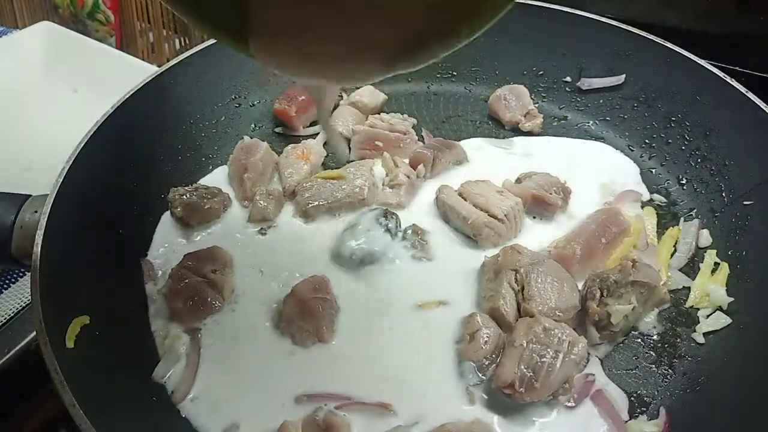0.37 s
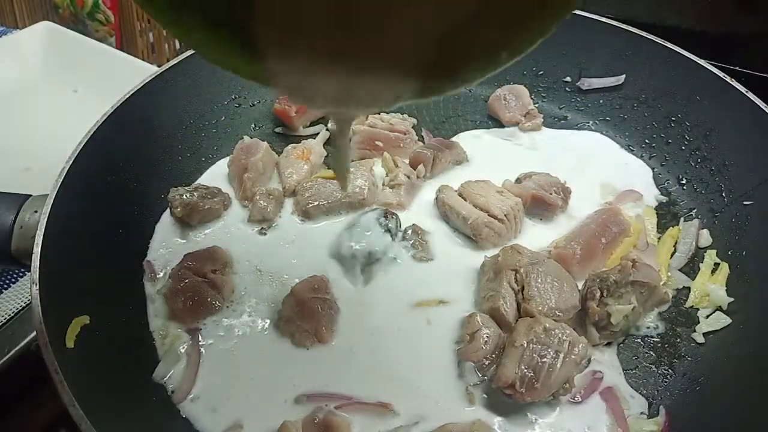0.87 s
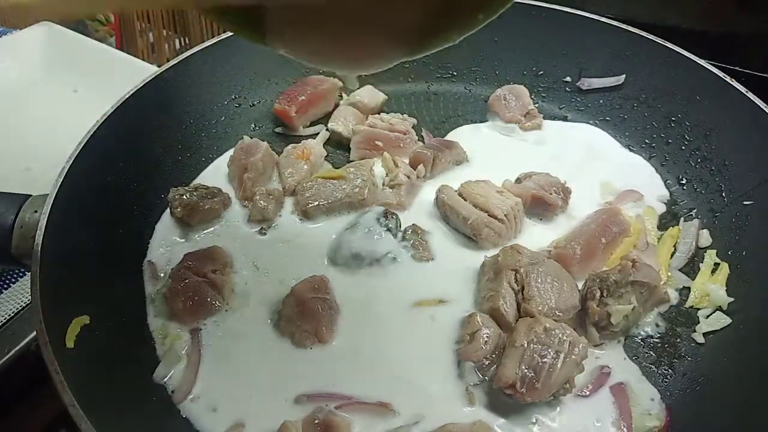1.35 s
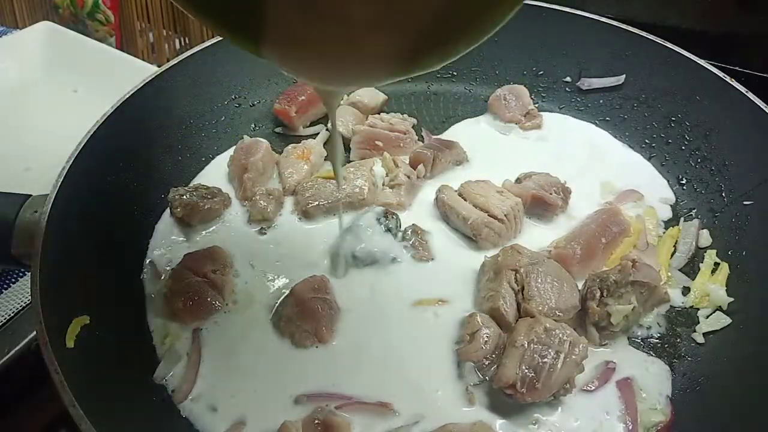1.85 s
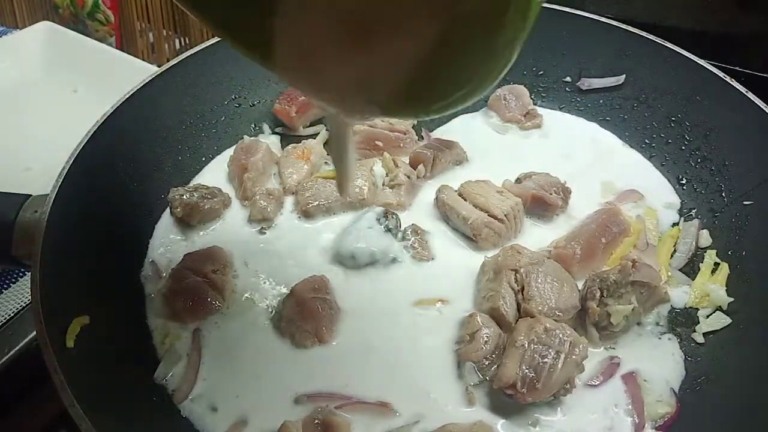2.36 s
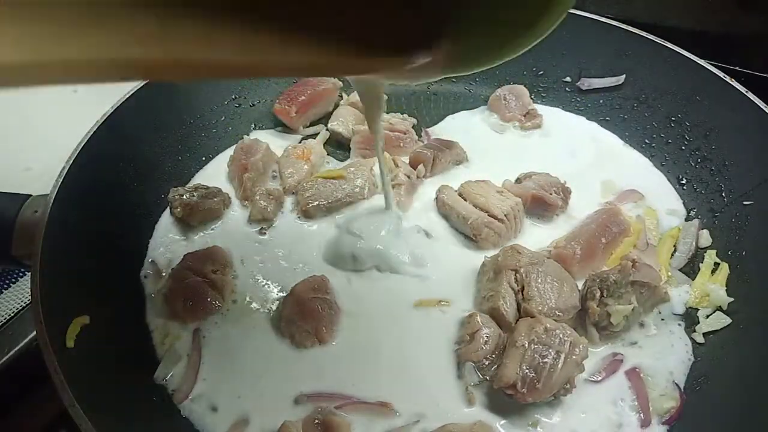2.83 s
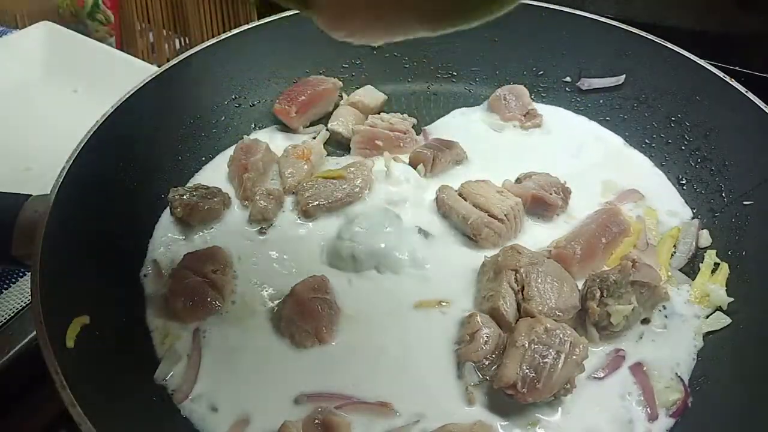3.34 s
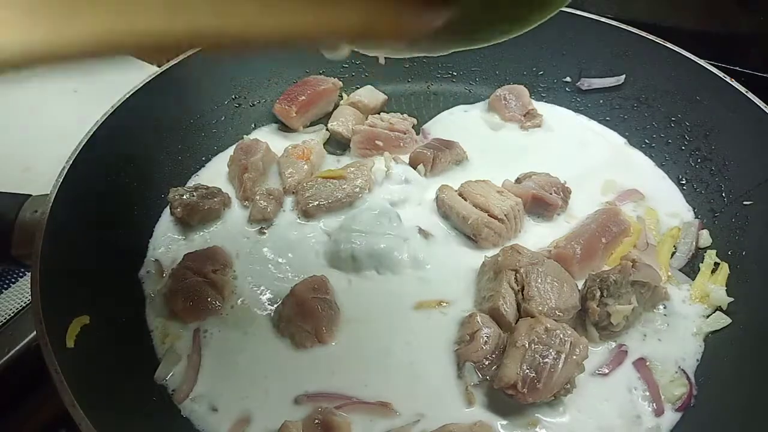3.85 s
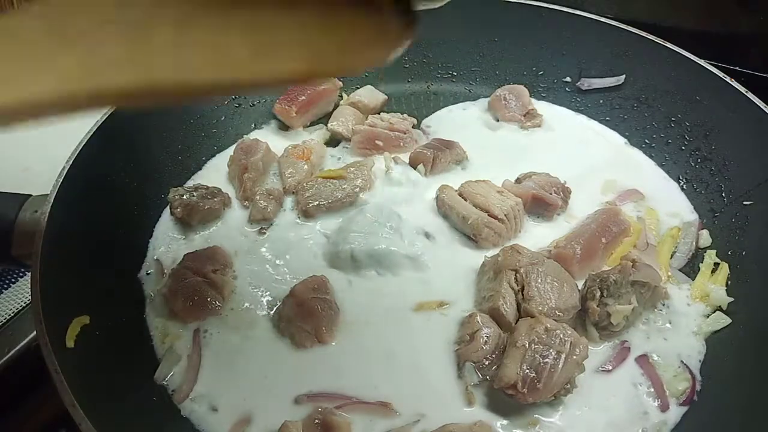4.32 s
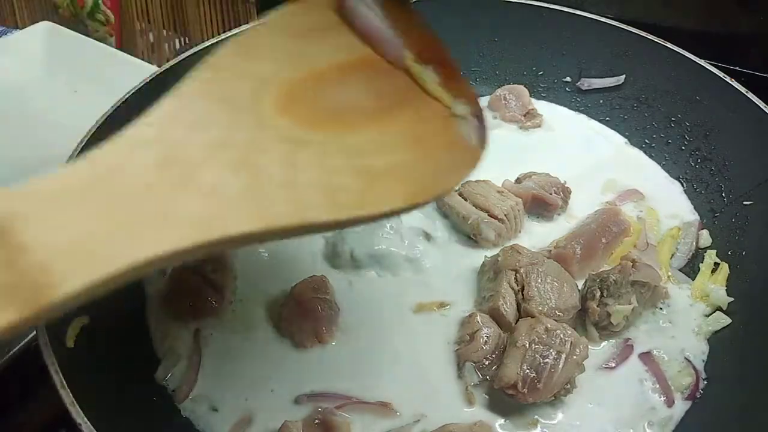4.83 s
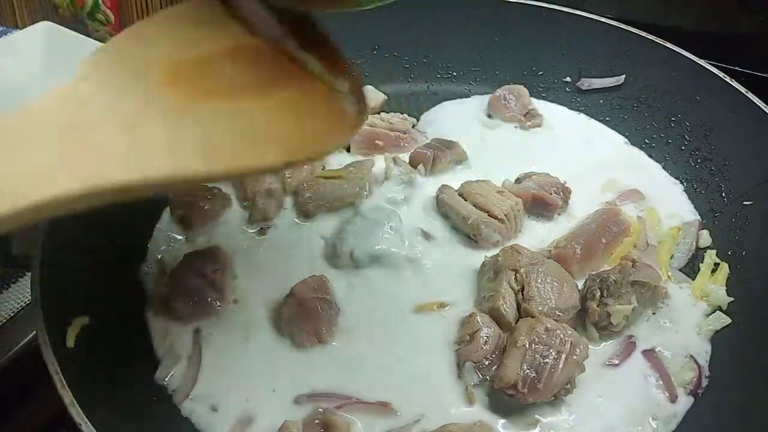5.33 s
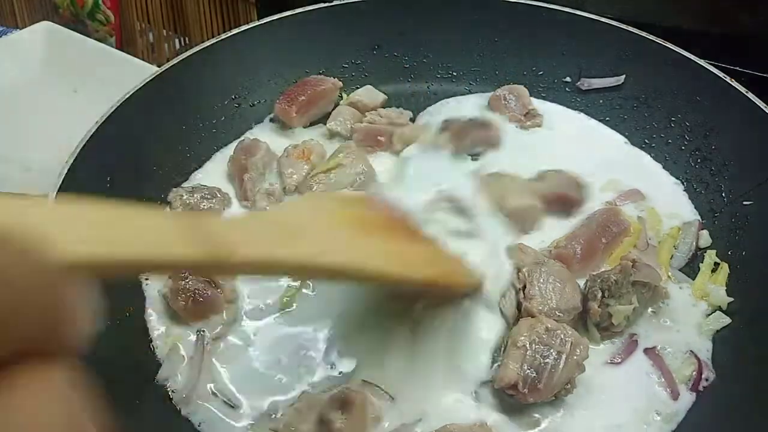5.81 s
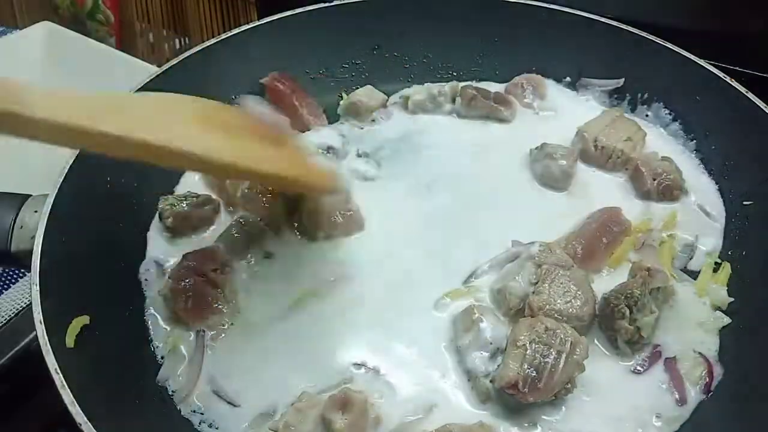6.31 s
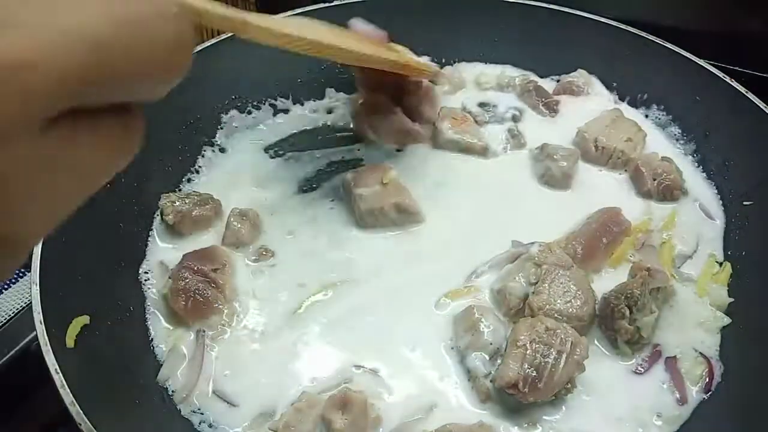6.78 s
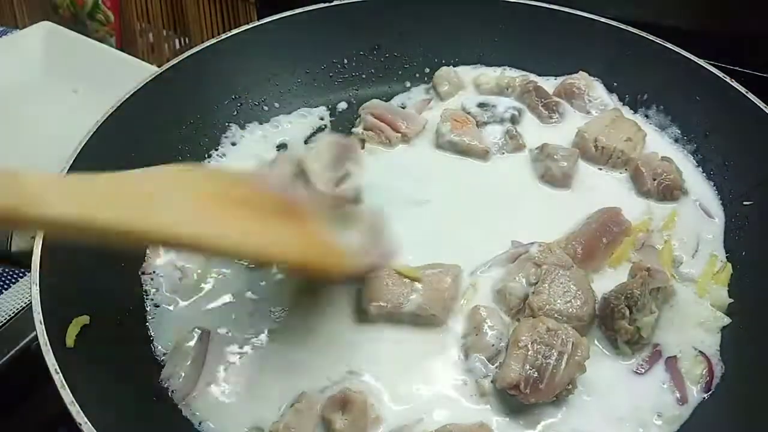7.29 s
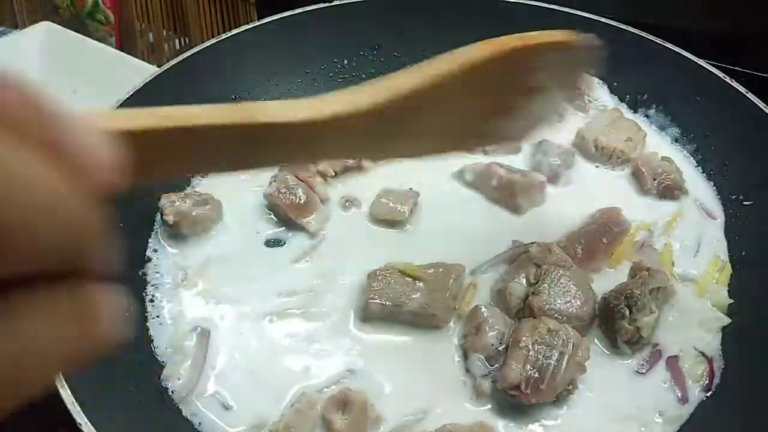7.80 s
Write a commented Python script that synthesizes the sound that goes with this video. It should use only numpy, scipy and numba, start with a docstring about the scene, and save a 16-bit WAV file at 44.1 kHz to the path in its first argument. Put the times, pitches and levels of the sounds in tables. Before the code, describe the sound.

In a small kitchen, a steady, bright sizzle of creamy liquid fills a close microphone, peppered with crackles and snappy steam pops. A wooden spatula taps a bowl irregularly with short hollow knocks. Later it stirs the pan with duller knocks; the sizzle flares sharply, then sinks to a weaker, patchy hiss. A faint wavering mains hum and low rumble lie underneath.

```python
"""In a small kitchen, creamy liquid sizzles in a hot pan close under one microphone.
Thousands of steam bubbles burst: filtered noise, clicks and short damped sines; some pop loudly.
A wooden spatula knocks the last drops out of a bowl, then stirs: both are ringing modes.
Stirring bares hot metal and later calms the sizzle. A mains hum of two sines wavers over a low
rumble of filtered noise, with a few dull bumps."""
import sys
import numpy as np
from scipy import signal
from scipy.fft import rfft, irfft
from scipy.io import wavfile
from scipy.ndimage import uniform_filter1d
from numba import njit

SR = 44100
rng = np.random.default_rng(int(sys.argv[2]) if len(sys.argv) > 2 else 0)


def dump_mix(stems):
    """Bounce the given channels to the path in sys.argv[1] as a 16-bit WAV at rate SR."""
    frames = np.atleast_2d(stems).T  # one column per channel
    limited = np.clip(frames, -1, 1)  # hard clip at full scale
    pcm = np.round(limited * 32767).astype(np.int16)
    wavfile.write(sys.argv[1], SR, pcm)


def volts_from_db(level):
    """Convert decibel levels to linear amplitude ratios."""
    exponent = np.asarray(level, float) / 20
    return 10 ** exponent


N = 359856
TIME = np.arange(N) / SR
MAIN_HZ = (4000, 9000)  # band in which the level of the main sizzle is counted


def curves(table):
    """Draw each column of a table as a line through time, one value a sample."""
    s, *columns = np.transpose(table)
    return [np.interp(TIME, s, c) for c in columns]


def filtered(x, order, hz, kind):
    """Pass x through a smooth filter that keeps only part of the pitch range."""
    return signal.sosfilt(signal.butter(order, hz, kind, fs=SR, output="sos"), x)


def below(x, hz):
    """Keep what lies below hz, without shifting it in time."""
    return signal.sosfiltfilt(signal.butter(2, hz, fs=SR, output="sos"), x)


def band_level(x, lo_hz, hi_hz):
    """Scale the whole sound so that one band of it has rms 1."""
    part = filtered(x, 4, [lo_hz, hi_hz], "bandpass")
    return x / np.sqrt(np.mean(part ** 2))


def colour(x, points, peaks=()):
    """Flatten the long-term spectrum, then give it the wanted one with its resonances."""
    spec = rfft(x)
    hz = np.arange(N // 2 + 1) * SR / N + 1
    spec = spec / np.sqrt(uniform_filter1d(np.abs(spec) ** 2, size=3000))
    point_hz, point_db = np.transpose(points)
    db = np.interp(np.log(hz), np.log(point_hz), point_db)
    for peak_hz, width_hz, peak_db in peaks:
        db = db + peak_db / (1 + (2 * (hz - peak_hz) / width_hz) ** 2)
    return irfft(spec * volts_from_db(db), N)


def walk(rate):
    """Wander at random: levels held 1 / rate s, then smoothed twice; spread near 1."""
    hold = int(SR / rate)
    steps = np.repeat(rng.standard_normal(N // hold + 1), hold)
    return 0.47 * uniform_filter1d(uniform_filter1d(steps, hold), hold)[:N]


@njit
def ring(count, at_s, hz, t60, size, rise_s):
    """Damped sines that swell in over rise_s and fall by 60 dB in t60 seconds."""
    out = np.zeros(count)
    for k in range(len(at_s)):
        first = int(at_s[k] * SR)
        turn = np.exp((2j * np.pi * hz[k] - np.log(1000) / t60[k]) / SR)
        z, late, fill = size[k] + 0j, 1., np.exp(-1 / (rise_s[k] * SR))
        for i in range(first, min(count, first + int(t60[k] * SR))):
            out[i] += z.imag * (1 - late)
            z, late = z * turn, late * fill
    return out


def spurts(at_s, size, fade_s):
    """Envelope of sudden bursts that die away, with slightly softened edges."""
    out = np.zeros(N)
    for s, g, fade in zip(at_s, size, fade_s):
        part = out[int(s * SR):int((s + 6 * fade) * SR)]
        part += g * np.exp(-np.arange(len(part)) / (fade * SR))
    return uniform_filter1d(out, size=12)


def swells(start_s, length_s, db):
    """Sum of soft-edged rises in level."""
    total = 0
    for s, length, d in zip(start_s, length_s, db):
        from_middle = np.abs((TIME - s - length / 2) / (0.48 * length))
        total = total + volts_from_db(d) * np.exp(-from_middle ** 5.9)
    return total


# the hum swells: start t/s, length t/s, level/dB (before the waver)
HUM_SWELLS = [(0.009, 0.13, -55), (0.177, 0.077, -54), (0.326, 0.081, -60), (0.447, 0.32, -53.5),
              (0.83, 0.13, -52), (1.022, 0.038, -52), (1.14, 0.089, -51), (1.423, 0.047, -59),
              (1.575, 0.076, -61), (1.735, 0.45, -54.5), (2.293, 0.075, -51), (2.505, 0.34, -52.5),
              (3.242, 0.036, -61), (3.4, 0.049, -60), (3.558, 0.12, -54), (3.777, 0.075, -49),
              (3.902, 0.077, -51), (4.036, 0.051, -55), (4.175, 0.064, -58), (4.314, 0.066, -55),
              (4.48, 0.041, -57), (4.567, 0.22, -59), (4.78, 0.25, -51.5), (5.119, 0.054, -61),
              (5.281, 0.086, -58), (5.415, 0.037, -59), (5.66, 0.066, -59), (5.853, 0.16, -54),
              (6.112, 0.58, -53.5), (6.803, 0.22, -52.5), (7.143, 0.15, -53.5), (7.398, 0.058, -59),
              (7.894, 0.19, -50.5)]


def hum_level():
    """Strength of the lower mains line: wavering swells over a faint, restless floor."""
    swelling = volts_from_db(3 * walk(22)) * swells(*np.transpose(HUM_SWELLS))
    return swelling + volts_from_db(-66.5 + 9.1 * walk(12))


# the upper line of the hum swells less often: start t/s, length t/s, level/dB
OVERTONE_SWELLS = [(0.188, 0.042, -61), (0.397, 0.09, -56), (1.181, 0.043, -62), (1.427, 0.06, -53.5),
                   (2.52, 0.16, -55), (3.003, 0.07, -51.5), (4.874, 0.117, -51.5), (6.475, 0.039, -64),
                   (6.852, 0.034, -60), (7.076, 0.043, -58)]


def mains_hum(first):
    """Mains hum is a steady low tone and one an octave up; only their strengths change."""
    second = swells(*np.transpose(OVERTONE_SWELLS)) + volts_from_db(-76.5 + 10.6 * walk(14))
    phase = 2 * np.pi * 120 * TIME  # 120 Hz
    return np.sqrt(2) * (first * np.sin(phase) + second * np.sin(2 * phase))


# colour of the rumble: f/Hz, level/dB (relative, per Hz)
RUMBLE_COLOUR = [(15, -55), (25, -71), (64, -14), (93, -5), (118, 2.5), (172, 1), (257, -9), (314, -12),
                 (500, -34), (650, -45), (1100, -120)]
# stove and worktop shake: start t/s, length t/s, level/dB (upper rumble), level/dB (deepest rumble)
SHAKES = [(0.195, 0.073, -58, -72), (1.44, 0.052, -56, -70), (1.975, 0.18, -81, -62),
          (2.53, 0.32, -57, -69), (4.783, 0.31, -69, -80), (6.412, 0.13, -56, -68),
          (7.957, 0.079, -70, -69)]


def rumble(hum_strength):
    """Low noise in two bands that waver alone, rise with the hum and swell with the shakes."""
    # a very faint flat floor above 900 Hz
    noise = colour(rng.standard_normal(N), [*RUMBLE_COLOUR, (900, -60)])
    deepest = below(noise, 100)
    start_s, length_s, upper_db, deepest_db = np.transpose(SHAKES)
    follow = (uniform_filter1d(hum_strength, size=4000) / np.mean(hum_strength)) ** 0.51
    upper_level = follow * volts_from_db(-65.5 + 2.7 * walk(11.0)) + swells(start_s, length_s, upper_db)
    deepest_level = follow * volts_from_db(-68 + 4.5 * walk(7.6)) + swells(start_s, length_s, deepest_db)
    return (upper_level * band_level(noise - deepest, 111, 280)
            + deepest_level * band_level(deepest, 40, 108))


# dull bumps from stove and worktop: t/s, level/dB (before the soft start), f/Hz, t60 t/s
BUMPS = [(1.19, -51, 326, .15), (2.24, -49, 412, .15), (2.521, -41.5, 160, 1), (2.62, -50.5, 315, 0.91),
         (2.83, -45, 280, 0.14), (6.409, -41.5, 332, 0.17), (6.44, -37, 164, 0.28), (6.451, -44, 213, .2),
         (6.47, -46, 420, .12), (6.481, -41, 270, 0.12), (6.819, -42.5, 390, 0.11), (7.2, -51, 195, .2)]


def bumps():
    """Each bump is one low damped sine with a soft start."""
    s, db, hz, t60 = np.transpose(BUMPS)
    return ring(N, s, hz, t60, volts_from_db(db), 3 / hz)


def room_tail():
    """The small kitchen answers with short diffuse noise that dies away."""
    t = np.arange(SR // 5) / SR
    t60_s, first_echo_s = .12, .006
    return rng.standard_normal(len(t)) * np.exp(-np.log(1000) * t / t60_s) * (t > first_echo_s)


def knocks(blows, modes, thud_db, thud_fall_db, base_db, contact_s, lag, crunch_db):
    """Blows share modes: strongest near the spot, high ones if hard, low ones if heavy."""
    s, db, spot_hz, edge_db, hardest_db = np.transpose(blows)[..., None]  # a row a blow
    hz, mode_db, t60 = np.transpose(modes)  # a column a mode
    # a blow that rings low is a heavy one: thud_db at 1 kHz, less for each octave up
    low_db = thud_db - thud_fall_db * np.log2(spot_hz / 1000)
    near = np.exp(-(np.log(hz / spot_hz) / 0.085) ** 2)
    t60 = t60 * (1 + .5 * near)  # the mode under the blow also rings longer
    group = np.digitize(hz, [700, 1600, 2300])  # low, middle, edge, hardest edge
    group_db = np.choose(group, [low_db, 0 * db, edge_db, hardest_db])
    gain_db = db + base_db + mode_db + 10 * near + group_db
    sign = (-1.) ** np.arange(len(hz))
    rise_s = np.tile(contact_s * (1000 / hz) ** lag, len(s))  # low modes build up later
    at_s = (s + 0 * hz).ravel()
    dry = np.zeros(N)
    # every mode is a close pair, tuned a little differently by each wet contact
    for pair_db in (-.5, -9):
        tuned_hz = hz * (1 + 0.016 * rng.standard_normal((len(s), len(hz))))
        size = sign * volts_from_db(gain_db + pair_db)
        dry += ring(N, at_s, tuned_hz.ravel(), t60.ravel(), size.ravel(), rise_s)
    # wood crushing wet food adds a short dull crunch
    crunch = filtered(rng.standard_normal(N), 2, [450, 2400], "bandpass")
    dry += crunch * spurts(s.ravel(), volts_from_db(db.ravel() + crunch_db), np.full(len(s), .004))
    return dry + volts_from_db(-41) * signal.fftconvolve(dry, room_tail())[:N]


# wooden spatula on the bowl: t/s, level/dB (relative), strongest ring f/Hz,
# edge level/dB, hardest edge level/dB (both added to the higher modes)
BOWL_KNOCKS = [(0.168, -22.5, 1120, -16, -19), (0.188, -16.5, 616, -8, -6), (0.406, -29.5, 818, -15, -16),
               (0.66, -22, 1130, -5, -14), (0.742, -35.5, 1400, 5, -5), (0.315, -30, 1100, -8, -15),
               (0.706, -21, 824, -14, -23), (1.013, -11, 888, -29, -31), (1.133, -20, 1020, -28, -24),
               (1.338, -12, 920, -32, -32), (1.631, -9, 945, -33, -31), (1.767, -25.5, 960, -19, -19),
               (2.033, -20.5, 905, -1, -3), (2.212, -28, 686, -16, 0), (2.512, -24, 874, -18, -19),
               (2.579, -15, 627, -10, -23), (2.763, -23.5, 623, -6, 1.5), (2.833, -23.5, 810, -17, -16),
               (3.127, -19.5, 856, -21, -12.5), (3.2, -28, 660, -2, -13), (3.5, -11, 985, -6.5, 0),
               (3.507, -21, 1140, -8, -2), (3.805, -13.5, 1130, -7, -12), (3.813, -22, 1200, -12, -15),
               (4.153, -11, 930, -29, -7), (4.158, -16, 1080, -25, -2.5), (4.443, -26, 1140, -17, -18),
               (4.697, -34, 720, -15, -15), (4.932, -27, 1000, -13, 1)]
# modes of the bowl: f/Hz, level/dB (relative), t60 t/s (away from the blow)
BOWL_MODES = [(390, 19.5, 0.023), (539, 16, 0.073), (660, 13.5, 0.031), (824, 5.5, 0.013), (945, 6, 0.018),
              (1130, -3, 0.053), (1226, -2, 0.03), (1422, -7, 0.071), (1830, 11.5, 0.03), (1957, 12, 0.019),
              (2370, 12, 0.019), (2675, 0.5, 0.079), (2890, 12, 0.014), (4500, -4, .015)]


def bowl():
    """The bowl rings briefly under each knock of the spatula."""
    return knocks(BOWL_KNOCKS, BOWL_MODES, thud_db=-35, thud_fall_db=26.9, base_db=-15.5,
                  contact_s=0.00088, lag=0.32, crunch_db=-20.5)


# wooden spatula on the pan: t/s, level/dB (relative), strongest ring f/Hz,
# edge level/dB, hardest edge level/dB (both added to the higher modes)
PAN_KNOCKS = [(6.295, -22.5, 1250, -11, -9), (6.376, -19, 1410, 0.5, -16), (6.419, -29.5, 453, 0, -11),
              (7.83, -39, 2080, 4.5, 0), (7.86, -14, 960, -5.5, -8), (7.974, -18, 1280, -10, -20),
              (8.093, -30.5, 960, -4, -15)]
# modes of the pan: f/Hz, level/dB (relative), t60 t/s (away from the blow)
PAN_MODES = [(164, 4, 0.1), (280, 7, 0.12), (389, 16, 0.16), (475, 14.5, 0.06), (600, 26, 0.027),
             (810, 9, 0.0072), (960, -10.5, 0.034), (1206, -3, 0.031), (1460, -2, 0.043), (1860, 8, 0.02),
             (2117, 7.5, 0.048), (2440, -1, .03)]


def pan():
    """The pan rings under the stirring spatula; its low modes build up much later than its high ones."""
    return knocks(PAN_KNOCKS, PAN_MODES, thud_db=-27, thud_fall_db=11.7, base_db=-14.5,
                  contact_s=0.0004, lag=3.5, crunch_db=-4)


# colour of the sizzle: f/Hz, level/dB (relative, per Hz)
SIZZLE_COLOUR = [(180, -60), (300, -50), (600, -17), (800, -19), (1140, -15.5), (1640, -16.5), (1910, -12),
                 (3280, -14), (5210, -10), (6200, -6), (8500, -7), (11000, -9), (13000, -7), (15000, -7)]
# resonances of pan and microphone port: f/Hz, width f/Hz, level/dB (added at the peak)
PORT = [(888, 44, 8), (1884, 29, 3.5), (3830, 650, 8), (6550, 190, 7), (6980, 320, 4), (7450, 840, 7),
        (9560, 1200, 2), (13530, 430, 6.5), (15000, 400, 7.5)]


def sizzle_colour(x):
    """Give a sound the colour of the sizzle, with the resonances of pan and microphone port."""
    return colour(x, SIZZLE_COLOUR, PORT)


def by_size(x):
    """Split into deep, large, main and fine bubbles (low to high) that add up to the whole."""
    deep, up_to_large, up_to_main = [below(x, hz) for hz in (780, 3200, 9500)]
    return deep, up_to_large - deep, up_to_main - up_to_large, x - up_to_main


# spurts of steam: t/s, level/dB (relative), strongest f/Hz, coarse spray level/dB (added), fade t/s
POPS = [(0.0722, -11.5, 7000, -10, .005), (0.44, -20, 7000, -5, 0.0067), (0.8305, -15, 6860, -13, 0.0045),
        (0.858, -12, 7100, -7, .003), (0.9986, -11.5, 7450, -3, .004), (1.1039, -9, 6600, 7, 0.0025),
        (1.1563, -20, 6680, -6, .004), (1.1807, -15, 7570, 5, 0.0027), (1.3272, -13.5, 7480, -12, .004),
        (1.39, -17, 6520, -11, 0.0028), (1.699, -18, 7140, 9, 0.0018), (1.9194, -15, 6450, -4, .003),
        (2.5823, -11, 7220, 6, 0.0087), (2.6, -14, 8000, -8, .002), (2.678, -17, 7260, 12, .003),
        (2.845, -15, 6860, -8, .004), (2.938, -14, 7000, -3, .003), (3.1612, -18, 7530, -8, .004),
        (4.133, -18, 4500, -9, 0.0055), (4.154, -13, 4600, 2, 0.0036), (4.278, -16.5, 7100, 8, 0.0047),
        (4.376, -19, 4300, -2, .007), (4.407, -14, 7670, -9, .005), (4.515, -14, 7200, -8, .005),
        (4.645, -16, 7000, -8, 0.0043), (4.685, -15, 7000, -5, .003), (4.75, -16, 7700, -4, .003),
        (4.82, -17, 7200, -8, .006), (4.9, -17, 3900, -8, 0.0079), (4.99, -15, 6610, -8, .004),
        (5.018, -9, 7000, -14, .003), (5.059, -16.5, 6900, 11.5, 0.0035), (5.3527, -17, 7550, -11, .004),
        (5.368, -14, 5500, -8, 0.0048), (5.482, -12, 7480, -15, 0.0067), (5.5347, -12, 7660, -14, 0.0082),
        (5.7017, -15, 6930, -8, 0.0045), (5.7289, -13, 6550, -10, .005), (5.793, -12, 6480, -5, 0.0034),
        (5.836, -11, 7140, -14, 0.0081), (5.945, -15, 7000, -13, 0.0056), (5.9868, -14, 7750, -14, .004),
        (6.056, -11, 6820, -4, 0.0045), (6.2277, -17, 7240, -5, .006), (6.4006, -11, 7390, 5.5, 0.0048),
        (6.462, -10, 5800, 4, .003), (6.5367, -13, 6270, 5, .003), (6.645, -10, 7100, -9, 0.0043),
        (6.578, -16, 7200, -5, 0.0028), (6.615, -15, 7000, 9, .004), (6.673, -13, 7500, -3, .002),
        (6.6885, -12, 6800, 6, 0.0029), (6.739, -14.5, 3600, -3, 0.0065), (6.765, -17, 6800, -3, .003),
        (6.797, -16, 6660, 1, .003), (6.722, -18, 6460, -1, .004), (6.8525, -14, 6920, -2, 0.0024),
        (6.864, -21, 7000, -2, .002), (7.036, -14, 6850, -1, 0.0055), (7.096, -22, 7000, -3, .006),
        (7.163, -20.5, 7250, 9, 0.0086), (7.249, -17, 7190, -7, 0.0034), (7.2707, -15, 7240, 5.5, 0.0034),
        (7.341, -17, 6900, -5, 0.0049), (7.4846, -11, 7250, 3, .003), (7.647, -25, 6800, -5, 0.0054),
        (7.676, -14.5, 6000, -8, .004), (7.7458, -20, 6590, -4, .003), (7.813, -21, 6290, -3, .003),
        (7.847, -19.5, 6580, 11, .003), (7.9414, -23, 7330, 9, 0.008), (7.976, -19, 6550, 4, 0.0034),
        (8.0684, -19.5, 6620, -3, 0.0032), (8.1199, -16, 7200, 0, 0.0033)]


def pops():
    """A click opens each spurt: spray, a dull tick and a swarm of bubbles ringing near one pitch."""
    s, db, hz, coarse_db, fade_s = np.transpose(POPS)
    fine_db = -2 * np.maximum(db + 15, 0)  # louder spurts carry less fine spray
    noise = band_level(sizzle_colour(rng.standard_normal(N)), *MAIN_HZ)
    _, coarse, main, fine = by_size(noise)
    spray = (coarse * spurts(s, volts_from_db(db + coarse_db - 8), fade_s)
             + main * spurts(s, volts_from_db(db - 11.5), fade_s)
             + fine * spurts(s, volts_from_db(db + fine_db - 11.5), fade_s))
    # the skin tears with a dull tick
    snap = ring(N, s, 0.27 * hz, 12 / hz, volts_from_db(db + coarse_db - 31), 0.44 / hz)
    snap = filtered(snap, 2, 900, "highpass")
    swarm = np.zeros(N)
    for late, pitch in rng.random((5, 2, len(s))):
        at_s = s + .0006 + 2.2 * fade_s * late
        near_hz = hz * (1 + .2 * (pitch - .5))
        swarm += ring(N, at_s, near_hz, 22 / hz, volts_from_db(db + 1 - 6.8 * late), 1.3 / hz)
    click = ring(N, s, hz, 6 / hz, volts_from_db(db - 6.5), 0.15 / hz)
    return spray + snap + swarm + click


def bubbles(lo_hz, hi_hz, t60, scatter_db, count):
    """Bursting bubbles ring at random pitches; most are tiny, a few are much larger."""
    when, pitch, size, life = rng.random((count, 4)).T
    hz = lo_hz + (hi_hz - lo_hz) * pitch ** 1.5
    size = volts_from_db(-scatter_db * np.log(1 - .99 * size))
    return ring(N, when * N / SR, hz, t60 * (.5 + life), size, 0.3 / hz)


def droplet_clicks():
    """Droplets that burst at once are bare clicks of either sign, about 1500 a second."""
    chance, size = rng.random((N, 2)).T
    height = volts_from_db(-2.5 * np.log(np.abs(2 * size - 1) + 0.0025))
    return (chance < 1500 / SR) * np.sign(size - .5) * height


def bubble_mass():
    """Countless tiny bubbles merge to a hiss; clicks and longer rings stand out of it."""
    hiss = band_level(rng.standard_normal(N), *MAIN_HZ)
    clicks = band_level(droplet_clicks(), *MAIN_HZ)
    short = band_level(bubbles(410.0, 14800.0, 0.0024, 1.5, count=30000), *MAIN_HZ)
    long = band_level(bubbles(301.0, 16000., 0.07, 2.8, count=8000), *MAIN_HZ)
    return sizzle_colour(hiss + volts_from_db(-5) * clicks + volts_from_db(-5) * short + volts_from_db(-4.0) * long)


def pan_resonance(large, cool):
    """A pan resonance comes up as the cooling liquid is spread thin."""
    edges_hz = 2110 + 72 * np.array([-.5, .5])
    b, a = signal.butter(1, edges_hz, "bandpass", fs=SR)
    return volts_from_db(-23.5 + 23.5 * cool) * 2 * signal.lfilter(b, a, large)


def spit(rise_db):
    """Liquid flashing to steam on bared metal spits droplets, growing faster than the sizzle."""
    droplets = band_level(bubbles(1420.0, 5470.0, 0.0033, 1.2, count=20000), 1200, 6600)
    return volts_from_db(-50 + 2.5 * rise_db + 3 * walk(30)) * droplets


def flutter():
    """Small spurts start suddenly, so the hiss rises faster than it falls."""
    when, size, life = rng.random((300, 3)).T
    return 1 + spurts(when * N / SR, -.25 * np.log(1 - .97 * size), 0.00035 + 0.0062 * life)


# the sizzle dips briefly: t/s, depth level/dB, length t/s
DIPS = [(0.16, -3, 0.037), (0.392, -2, 0.033), (1.097, -10.5, 0.016), (1.135, -4.5, 0.053),
        (1.406, -5, 0.045), (2.127, -4, 0.043), (3.18, -5, 0.039), (3.312, -6, 0.044), (4, 0, 0.03),
        (4.446, -2.5, 0.048), (5.545, -1.5, 0.02), (6.46, -4, 0.018)]


def surge_and_dips(cool):
    """All bubble sizes surge and dip together (dB)."""
    surge_db = 0.46 * walk(12) + 0.66 * walk(30) + 1.76 * walk(60)
    surge_db = surge_db * (1 + 0.73 * cool)  # fewer bubbles are left, so the hiss grows more uneven
    dip_db = sum(db * np.exp(-(2 * (TIME - s) / length) ** 4) for s, db, length in DIPS)
    return surge_db + dip_db


# the sizzle: t/s, level/dB (before surges and the final trim), stirring (0-1),
# how far the liquid has cooled the pan (0-1)
SIZZLE = [(0, -30, 0.5, 0.07), (.75, -30, 0.2, 0), (1.5, -30.5, 0.1, 0.09), (2.75, -30.5, 0.34, 0.14),
          (3.5, -28.5, 0.04, 0.25), (4.5, -30.5, 0, 0.28), (5.25, -29.5, 0, 0.3), (5.9, -29, 0.24, 0.08),
          (6.1, -29.5, 0.7, 0.23), (6.35, -29.5, 0.54, 0.3), (6.47, -28.5, 0.2, 0.3),
          (6.52, -25.5, 0.03, 0.3), (6.6, -25.5, 0, 0.1), (6.65, -26, 0.2, 0.4), (6.74, -26, 0, 0.5),
          (6.82, -28, 0, .3), (6.92, -29.5, 0, 0.27), (7.05, -31, 0, 0.6), (7.3, -32.5, 0, 0.76),
          (7.4, -34.5, 0.24, 0.78), (7.89, -37.5, 0.5, 1), (8.16, -38, 0.92, 1)]


def sizzle():
    """Four bubble sizes surge together and flicker alone as stirring and cooling change the hiss."""
    level_db, stir, cool = curves(SIZZLE)
    rise_db = level_db + 30.5  # above the reference level of -30.5 dB
    # each size follows its own share of the level, and answers stirring and cooling its own way
    large_db = -44.5 + 1.1 * rise_db + 4.5 * stir + 7 * cool
    fine_db = -33.5 + 0.6 * rise_db + 4.5 * stir - 6.5 * cool
    deep_db = -61.5 - 0.5 * rise_db + 19 * stir - 13 * cool
    deep, large, main, fine = by_size(bubble_mass())
    large = band_level(filtered(large, 3, 640, "highpass"), 900, 3000)
    large = large + pan_resonance(large, cool)
    gurgle_db = 6 * (walk(3.82) + walk(12))
    mix = (volts_from_db(deep_db + gurgle_db) * band_level(deep, 330, 750)
           + spit(rise_db)
           + volts_from_db(large_db + 0.74 * walk(30)) * large
           + volts_from_db(level_db + 0.19 * walk(21)) * band_level(main, *MAIN_HZ)
           + volts_from_db(fine_db + 0.66 * walk(30)) * band_level(fine, 10000, 15400))
    return flutter() * volts_from_db(surge_and_dips(cool) - 2.5) * mix


def scene():
    """One microphone hears every source and feeds both channels."""
    hum_strength = hum_level()
    kitchen = mains_hum(hum_strength) + rumble(hum_strength) + bumps()
    spatula = bowl() + pan()
    return np.tile(kitchen + spatula + pops() + sizzle(), (2, 1))


def low_pass(x):
    """Removes everything above the highest recorded frequency."""
    return signal.sosfilt(signal.butter(12, 16690, fs=SR, output="sos"), x)


def record(dry):
    """The top is cut steeply and the deepest bass is rolled off."""
    steep = signal.ellip(12, .3, 60, 15490, fs=SR, output="sos")  # 0.3 dB ripple, 60 dB down, 15490 Hz
    mix = signal.sosfilt(steep, dry)
    mix = filtered(mix, 2, 45, "highpass")
    return low_pass(mix)


dry = scene()
out = record(dry)
dump_mix(out)
```